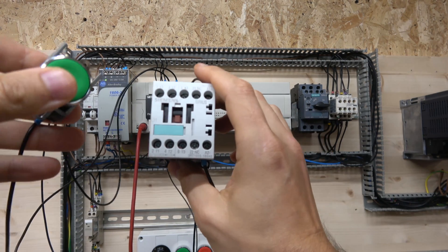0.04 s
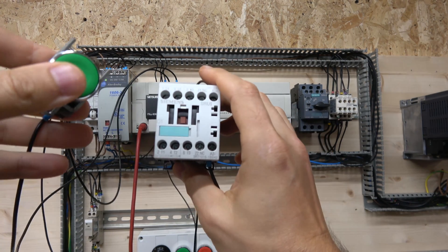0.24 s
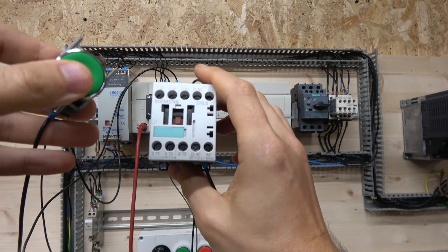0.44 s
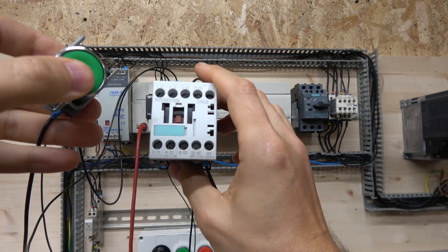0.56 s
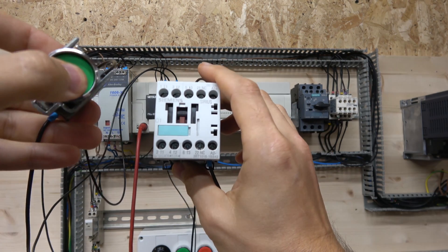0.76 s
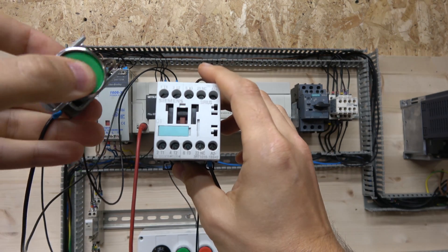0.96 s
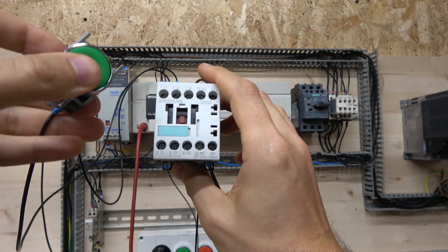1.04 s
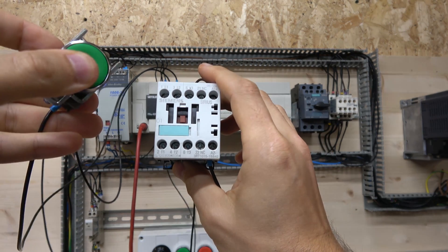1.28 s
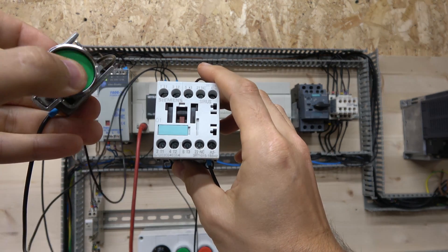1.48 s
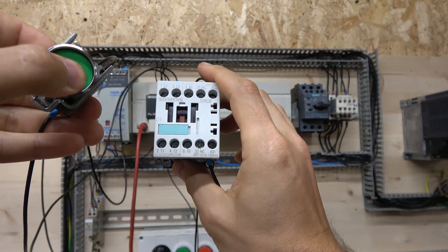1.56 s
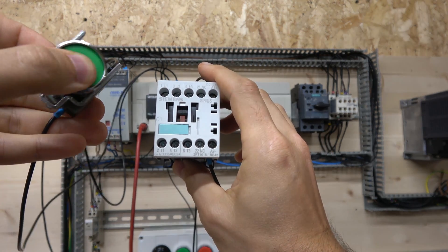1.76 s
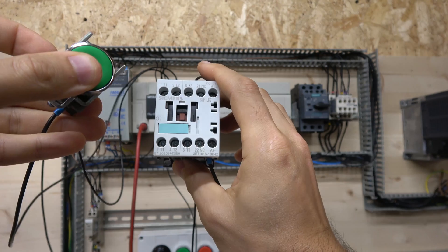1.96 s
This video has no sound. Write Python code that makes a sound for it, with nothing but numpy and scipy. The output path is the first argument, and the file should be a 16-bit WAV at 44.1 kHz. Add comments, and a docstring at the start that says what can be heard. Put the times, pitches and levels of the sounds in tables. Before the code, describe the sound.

Two pairs of sharp, close clacks as a push button switches a small contactor in and out, a fan humming quietly underneath.

```python
"""Two pairs of sharp clacks, close by: a small contactor is switched on and off twice with a push button.
On: the button rubs and ticks, the carrier slides, the contacts chatter and the armature slams onto
the core, leaving the springs ringing. Off: the contacts part and the carrier hits its plastic stop.
A small room answers each clack; a fan hums softly underneath."""
import sys
import numpy as np
from scipy import signal
from scipy.fft import rfft, irfft
from scipy.io import wavfile

SR = 44100
rng = np.random.default_rng(int(sys.argv[2]) if len(sys.argv) > 2 else 0)


def put_to_file(sound):
    """Save the sound as 16-bit audio at rate SR, in the file named by the first command-line argument."""
    columns = np.atleast_2d(sound).T  # one column per channel
    safe = np.clip(columns, -1, 1)
    whole_steps = np.round(safe * 32767)
    wavfile.write(sys.argv[1], SR, whole_steps.astype(np.int16))


N = 88949
T = np.arange(N) / SR

# The armature slams onto the core: t/s, level/dB, spring ring/dB, hardness/(dB per octave)
SLAMS = [(0.7437, -16.5, -39, 0.5), (1.5559, -17.5, -30.5, 1.5)]
# Tone of the thin scrape, hollow knock, bright chatter and hard slam: f/Hz, level/dB
SCRAPE_EQ = [(400, -23), (1500, -8), (3500, -1), (6100, 8), (8000, -6.5), (13000, 1.5), (16000, -6.5)]
KNOCK_EQ = [(150, -42.5), (450, -20), (800, 10.5), (1300, -7.5), (2400, 1.5), (3200, -6), (4800, -1.5),
            (7500, -6.5), (16000, -15.5)]
CHATTER_EQ = [(300, -11.5), (1500, 2.5), (4000, 1.5), (6000, 1), (9300, 10.5), (11500, -0.5), (13500, 5.5),
              (16000, -13.5)]
SLAM_EQ = [(80, -50), (250, -17), (480, -21), (750, 18.5), (1100, 11.5), (1400, -5.5), (2200, 1.5),
           (3000, -4.5), (4100, 9), (6000, 1), (7500, -11), (10500, -11), (13000, -1.5), (16000, -17)]
SCRAPE_RISE_S, KNOCK_RISE_S, CHATTER_RISE_S = 0.0012, 0.00015, 0.00086

def closing():
    """The coil pulls: the carrier scrapes along its guides, the contacts bounce, the armature slams home."""
    # Each stage: lead before the slam/s, level against it/dB, decay/s
    slide, catch = (0.0318, -16.5, 0.0094), (0.0283, -13.5, 0.002)
    slack = (0.014, -13.5, 0.009)  # loose parts take up their play
    push = (0.0104, -10.5, 0.002)  # the carrier knocks against the contact bridges
    bounce = (0.0065, -1, 0.0013)
    first_edge = (0.0031, 1.2, 0.0073)  # one edge of the armature lands early
    scrape = sum(stage(SLAMS, step, SCRAPE_RISE_S, SCRAPE_EQ) for step in (slide, catch))
    knocks = sum(stage(SLAMS, step, KNOCK_RISE_S, KNOCK_EQ) for step in (slack, push, first_edge))
    chatter = stage(SLAMS, bounce, CHATTER_RISE_S, CHATTER_EQ)
    slam = bursts(SLAMS, SLAM_EQ, rise_s=0.00037, decay_s=0.0086)
    return scrape + knocks + chatter + slam


# The carrier falls back on its stop: t/s, level/dB, spring ring/dB, hardness/(dB per octave)
STOPS = [(1.0901, -15, -59.5, 0.5), (1.8950, -15, -75, 0)]
# Tone of the plastic stop: f/Hz, level/dB
STOP_EQ = [(80, -25.5), (200, -21), (350, -7.5), (580, -12), (730, -6), (880, -2), (1250, -5.5), (1850, 5),
           (2500, 1), (3200, -1.5), (4400, -1), (6500, -2), (9300, -5.5), (16000, -12.5)]

def opening():
    """The spring pushes back: the carrier scrapes, knocks the contacts apart and crashes into its stop."""
    # Each stage: lead before the stop/s, level against it/dB, decay/s
    slide, slack = (0.0179, -28, 0.01), (0.0136, -20, 0.0056)
    bridges_lift, contacts_part = (0.013, -13.5, 0.018), (0.0081, -2.8, 0.004)
    scrape = stage(STOPS, slide, SCRAPE_RISE_S, SCRAPE_EQ)
    knocks = sum(stage(STOPS, step, KNOCK_RISE_S, KNOCK_EQ) for step in (slack, bridges_lift))
    chatter = stage(STOPS, contacts_part, CHATTER_RISE_S, CHATTER_EQ)
    crash = bursts(STOPS, STOP_EQ, rise_s=0.00085, decay_s=0.0054)
    return scrape + knocks + chatter + crash


def stop_clicks(click_db=-3):
    """The carrier's first touch on its stop is one hard click."""
    touches = np.zeros(N)
    touches[[int(start * SR) for start, *_ in STOPS]] = amp(click_db)
    return colour(touches, STOP_EQ)


def rattle():
    """The noisy layer of all four clacks, with fresh grain on every call."""
    return closing() + opening()


# Modes of the housing (magnet closed, magnet open) and of the springs: f/Hz, level/dB, t60/s
CLOSED_MODES = [(325.5, -26.5, 0.18), (664, -48, 0.048), (763, -5.5, 0.085), (797, -6, 0.055),
                (839, -7.5, 0.065), (991.4, -5, 0.083), (1100, -41, 0.13), (2410, -14, 0.15),
                (4010, -3, 0.049)]
OPEN_MODES = [(736, 1, 0.061), (750, -11, 0.065), (1038, -0.5, 0.035), (1920, -17, 0.0049),
              (2385, 0, 0.024), (4410, 2, 0.035)]
SPRING_MODES = [(2398, -21, .85), (3392, 0, 0.34), (3580, -13, 0.2), (4081, -17, .25), (8473, -14, 0.29),
                (8880, -13, 0.28)]

def housing_and_springs(slam_body_db=0.17, stop_body_db=-14.5):
    """Each blow rings the housing and the springs; a harder blow brightens the housing."""
    out = np.zeros(N)
    for blows, housing, body_db in (SLAMS, CLOSED_MODES, slam_body_db), (STOPS, OPEN_MODES, stop_body_db):
        for start, blow_db, spring_db, hardness in blows:
            tilted = [(hz, db + hardness * np.log2(hz / 1000), t60) for hz, db, t60 in housing]
            out += ring(tilted, start, blow_db + body_db) + ring(SPRING_MODES, start, spring_db)
    return out


# Push-button ticks: t/s, snap level/dB, cap f/Hz, cap level/dB
BUTTON_TICKS = [(0.695, -32, 3370, -58), (1.058, -38.5, 3200, -28), (1.433, -55.5, 3730, -41),
                (1.4526, -45.5, 4470, -61), (1.506, -29.5, 2870, -29), (1.8455, -59, 2100, -42),
                (1.8635, -37.5, 3500, -23)]
# Tone of the crisp snap and of the plunger's soft rub: f/Hz, level/dB
SNAP_EQ = [(500, -23.5), (1700, -30), (2800, -1.5), (4500, -2), (6500, 3.5), (10000, -1.5), (13000, -8),
           (16000, -20)]
RUB_EQ = [(600, -22), (1900, -2.5), (3100, 8), (4500, -1.5), (6800, 2), (10000, -6), (16000, -18.5)]

def button(snap_s=0.00066, cap_t60=0.0054, fingertip_hz=4500):
    """The plunger rubs in its sleeve; each tick is a snap plus a cap ring muffled by the fingertip."""
    snaps = bursts(BUTTON_TICKS, SNAP_EQ, rise_s=snap_s / 2, decay_s=snap_s)
    caps = sum(ring([(hz, 0, cap_t60)], start, db) for start, _, hz, db in BUTTON_TICKS)
    fingertip = signal.butter(2, fingertip_hz, fs=SR, output="sos")
    press = (0.093, -40, 0.012)  # lead before the blow/s, level against it/dB, decay/s
    rub = stage(SLAMS + STOPS, press, rise_s=0.057, eq=RUB_EQ)
    return snaps + signal.sosfilt(fingertip, caps) + rub


# Bands of the room's tail: f/Hz, level/dB, t60/s
ROOM_BANDS = [(120, -17, .3), (350, -7.5, 0.47), (750, -11.5, 0.29), (1120, -2.5, 0.29), (2000, -4, 0.3),
              (4500, -6, 0.32), (9000, -7.5, 0.31), (15000, -7, 0.11)]

def reflections(x, predelay_s=0.003, build_s=0.0024, size=32768):
    """One path through the room: dense reflections, each band dying at its own rate."""
    age = np.maximum(T[:size] - predelay_s, 0)
    centres_hz = np.array(ROOM_BANDS)[:, 0]
    noise, tail = rfft(rng.standard_normal(size)), 0
    for (_, db, t60), solo in zip(ROOM_BANDS, np.eye(len(ROOM_BANDS))):
        band = irfft(noise * curve(centres_hz, solo, size))
        envelope = np.minimum(age / build_s, 1) * np.exp(-np.log(1000) * age / t60)
        tail = tail + amp(db) * band * envelope / np.linalg.norm(envelope)
    return signal.fftconvolve(x, tail)[:N]


# Stereo width of the room: f/Hz, side against mid/dB
ROOM_SIDE = [(200, -7), (700, -21.5), (1800, -48), (4500, -23.5), (8000, -2.5), (15000, -7.5)]

def room(ring_out, wet_db=-1, ring_send_db=-1, walls=4):
    """The rattle radiates differently towards each wall, so the echoes blend into a smooth decay."""
    sends = [amp(ring_send_db) * ring_out + rattle() for _ in range(walls)]
    mid = sum(reflections(send) for send in sends) / np.sqrt(walls)
    return amp(wet_db) * widen(mid, reflections(sends[0]), ROOM_SIDE)


# Tone of the steady air bed: f/Hz, level/dB
AIR_EQ = [(25, -3.5), (50, 0), (75, -1.5), (150, -8), (270, -9), (390, -5.5), (520, -9.5), (720, -7.5),
          (1000, -6.5), (1220, -11.5), (1400, -21), (2400, -26), (16000, -26)]
# Its stereo width: f/Hz, side against mid/dB
AIR_SIDE = [(40, -18), (200, -2.5), (500, -17), (1200, -7.5), (3000, -7.5), (8000, -1)]
# Resonances in the fan's rush: f/Hz, bandwidth/Hz, level/dB, left minus right/dB
FAN_RESONANCES = [(408.8, 13, -70, 7), (664, 19, -68, 6), (729, 48, -67.5, -4), (1173, 31, -69, -9.5)]

def fan(air_db=-61, hum_hz=93, hum_db=-53):
    """A fan: a steady low hum and a soft rush of air with a few hollow resonances."""
    mid, side = (colour(rng.standard_normal(N), AIR_EQ) for _ in range(2))
    air = amp(air_db) * widen(mid, side, AIR_SIDE)
    for hz, width_hz, db, pan_db in FAN_RESONANCES:
        rush = signal.lfilter(*signal.iirpeak(hz, hz / width_hz, fs=SR), rng.standard_normal(N))
        air += amp(db) * pan(pan_db) * unit(rush)
    return air + amp(hum_db) * np.sin(2 * np.pi * hum_hz * T)


def stage(blows, step, rise_s, eq):
    """One stage of the travel: a burst a set time ahead of every blow, following that blow's level."""
    lead_s, stage_db, decay_s = step
    hits = [(start - lead_s, db + stage_db) for start, db, *_ in blows]
    return bursts(hits, eq, rise_s, decay_s)


def bursts(hits, eq, rise_s, decay_s):
    """Volleys of tiny impacts: each swells and dies away, its damped ringing shaped by the EQ."""
    out = np.zeros(N)
    for start, db, *_ in hits:
        span = slice(int(start * SR), int((start + rise_s + 10 * decay_s) * SR))
        age = np.maximum(T[span] - start, 0)
        envelope = np.minimum(age / rise_s, 1) * np.exp(-np.maximum(age - rise_s, 0) / decay_s)
        grain = rng.choice([-1, 1], SR // 2)[:len(age)]
        out[span] += amp(db) * envelope * grain
    return colour(out, eq)


def ring(modes, start, level_db):
    """Damped modes kicked together at one instant; the air follows their velocity."""
    age = np.maximum(T - start, 0)
    swing = sum(amp(level_db + db) * np.cos(2 * np.pi * hz * age) * np.exp(-np.log(1000) * age / t60)
                for hz, db, t60 in modes)
    return swing * (T >= start)


def colour(x, eq, keep_power=True, size=4096):
    """Causal EQ through (f/Hz, level/dB) points, by default with unit gain for white noise."""
    gain = amp(curve(*np.transpose(eq), size))
    cepstrum = irfft(np.log(unit(gain) if keep_power else gain))
    cepstrum[1:size // 2] *= 2  # minimum phase: nothing rings ahead of a hit
    cepstrum[size // 2 + 1:] = 0
    impulse = irfft(np.exp(rfft(cepstrum)))
    return signal.fftconvolve(x, impulse)[:N]


def curve(hz, values, size):
    """Join points along log frequency, giving one value per FFT bin."""
    bins_hz = np.arange(size // 2 + 1) * SR / size
    return np.interp(np.log(bins_hz + 1), np.log(hz), values)


def widen(mid, side, side_eq):
    """Left and right from a common sound and a weaker side signal."""
    return mid + colour(side, side_eq, keep_power=False) * np.array([[1], [-1]])


def pan(db):
    """Left and right gains for a level difference."""
    return amp(np.vstack([db, -db]) / 2)


def amp(db):
    """Decibels to gain."""
    return 10 ** (np.asarray(db) / 20)


def unit(x):
    """Scale to rms 1."""
    return x / np.sqrt(np.mean(x ** 2))


# Stereo width of the direct rattle: f/Hz, side against mid/dB
DIRECT_SIDE = [(200, -4.5), (700, -13.5), (2000, -17), (4500, -23), (8000, -18), (15000, -26)]

def scene():
    """Button and contactor up front and centred, the rattle slightly spread; room and fan behind."""
    ring_out = button() + stop_clicks() + housing_and_springs()
    direct = widen(ring_out + rattle(), rattle(), DIRECT_SIDE)
    return direct + room(ring_out) + fan()


# Tonal balance of the two microphones: f/Hz, left minus right/dB
MIC_PAN = [(30, -0.5), (95, -3.5), (250, 2.5), (400, -2.5), (540, 4), (820, -2.5), (1000, -1), (1220, -5),
           (1500, -2.5), (3000, 0), (9000, 0.4)]

def record(dry, top_hz=15700):
    """Each microphone adds its own colour; a steep low-pass cuts the top."""
    balance_db = curve(*np.transpose(MIC_PAN), 2 * N)
    heard = irfft(rfft(dry, 2 * N) * pan(balance_db))[:, :N]
    low_pass = signal.ellip(10, 0.2, 80, top_hz, fs=SR, output="sos")
    return signal.sosfilt(low_pass, heard)


dry = scene()
out = record(dry)
put_to_file(out)
```